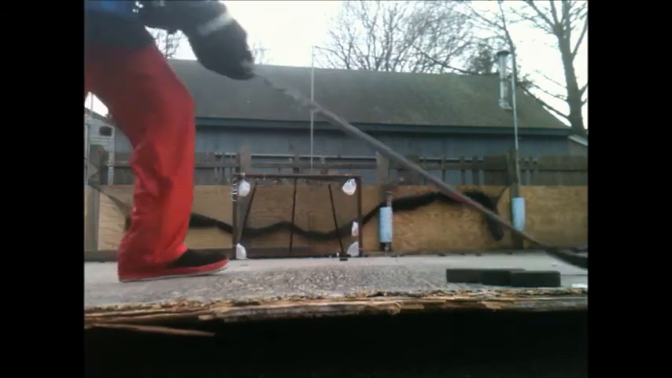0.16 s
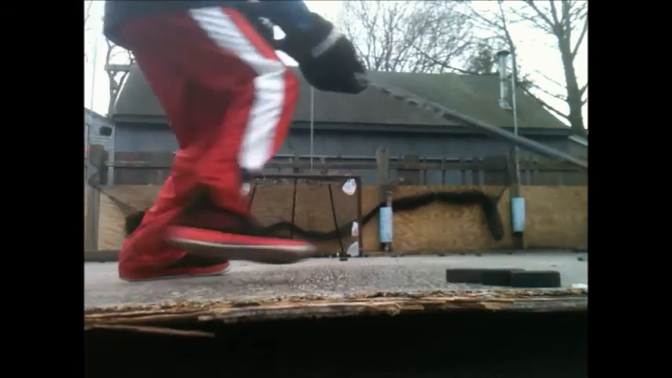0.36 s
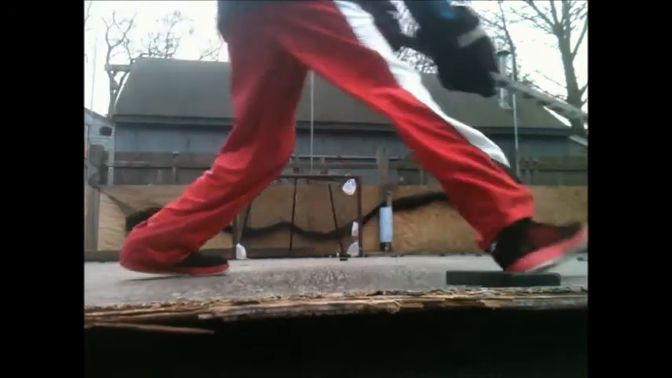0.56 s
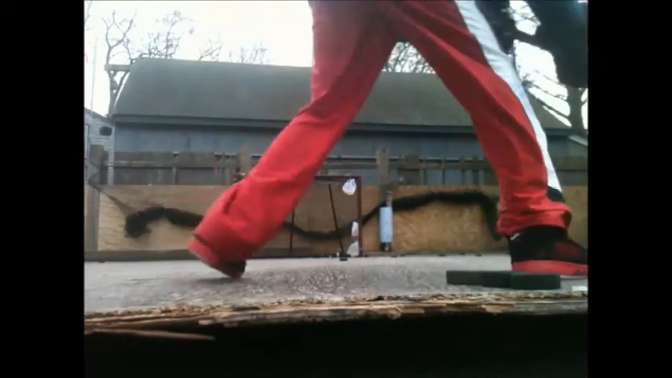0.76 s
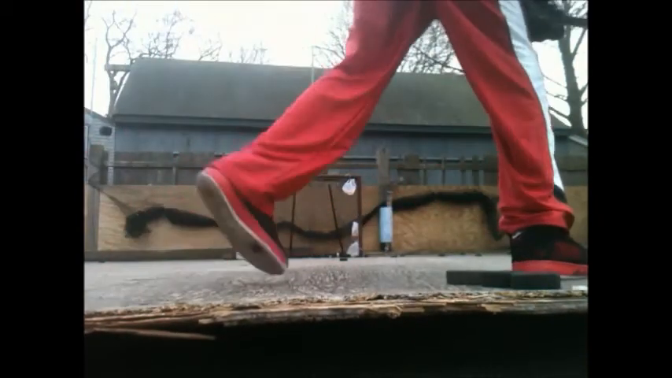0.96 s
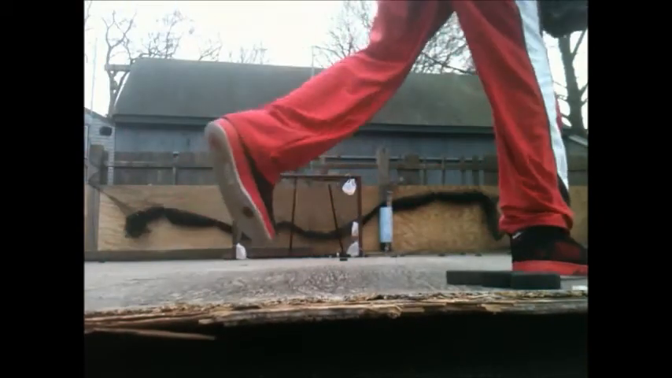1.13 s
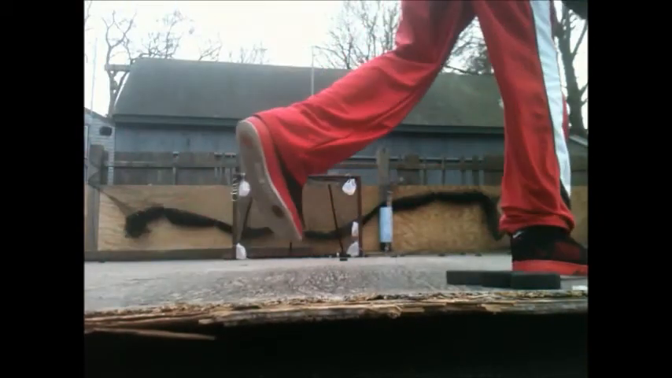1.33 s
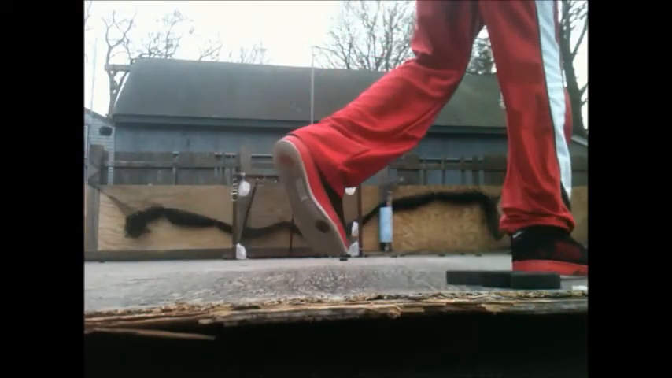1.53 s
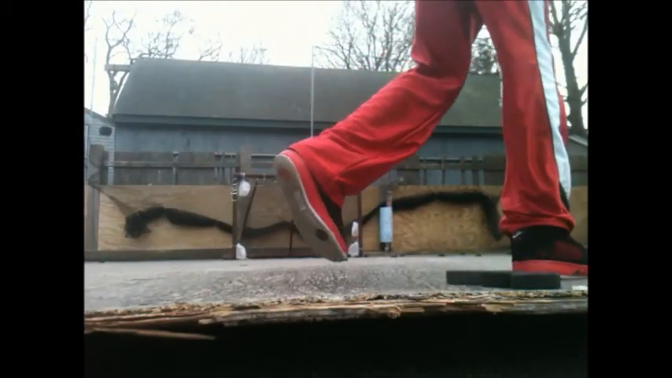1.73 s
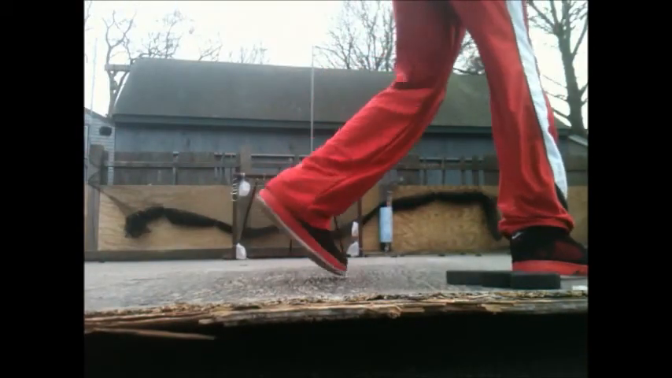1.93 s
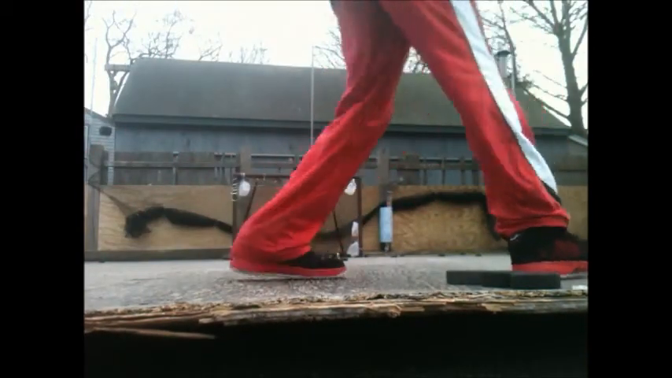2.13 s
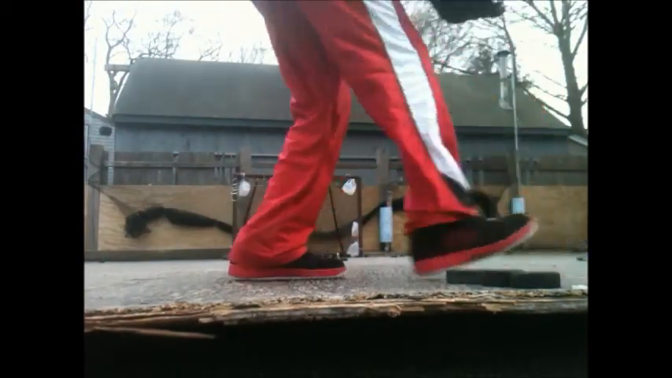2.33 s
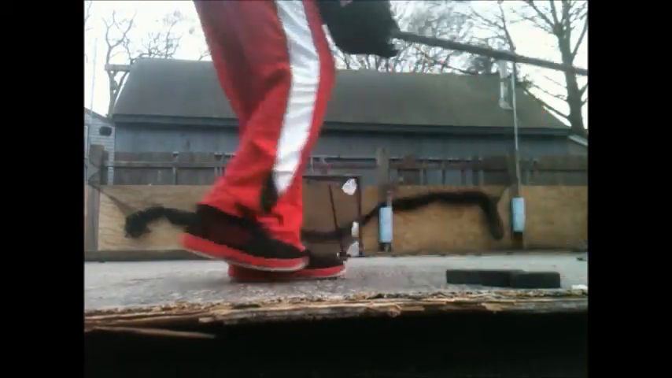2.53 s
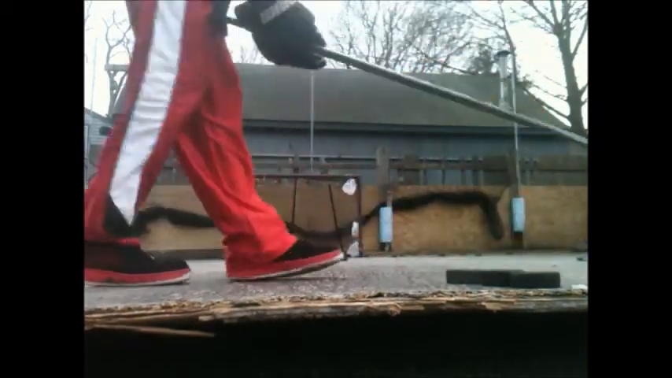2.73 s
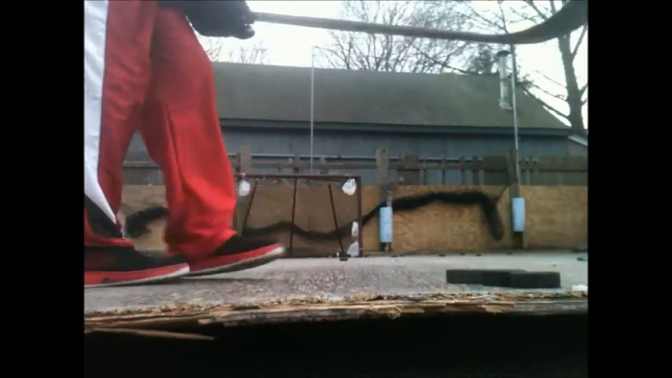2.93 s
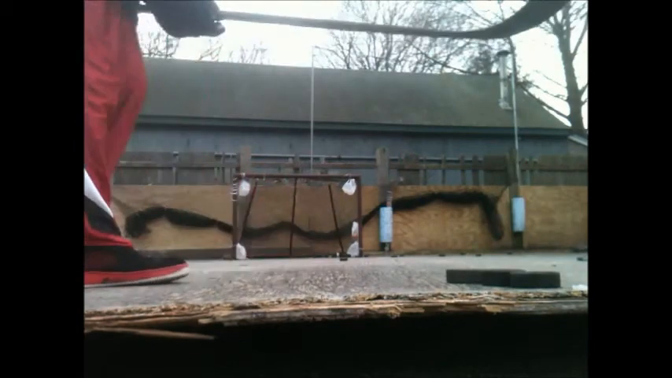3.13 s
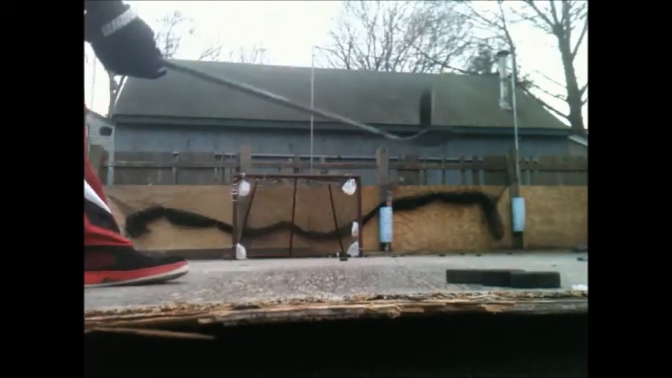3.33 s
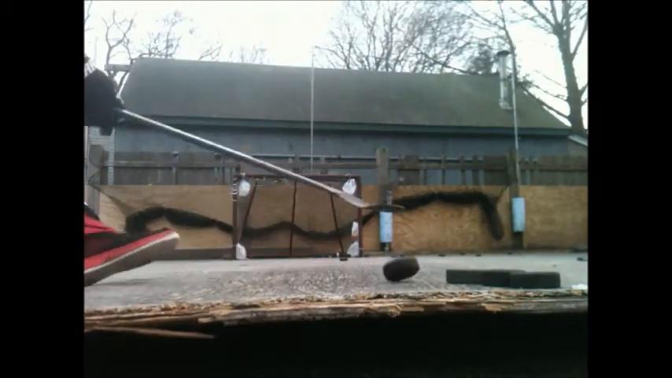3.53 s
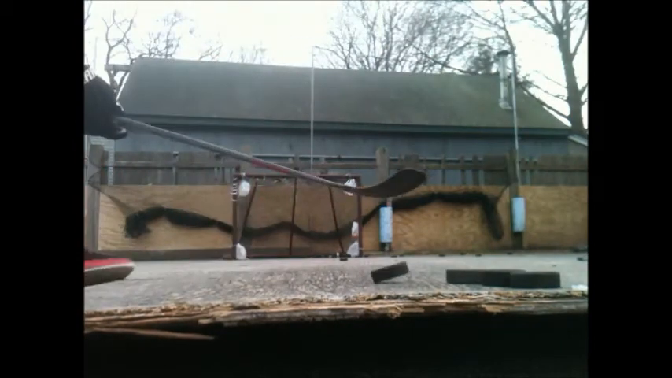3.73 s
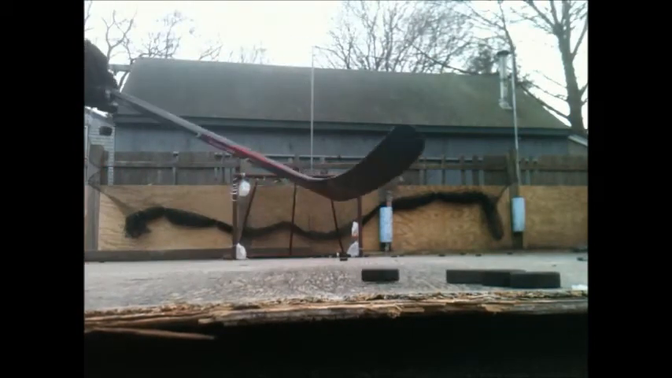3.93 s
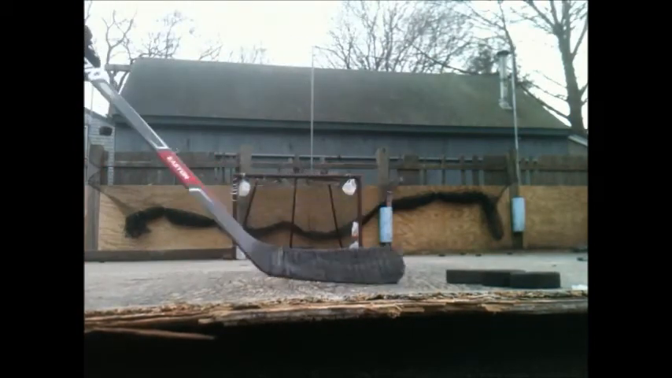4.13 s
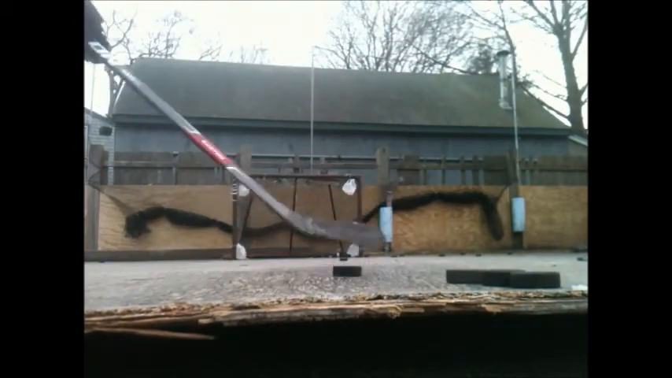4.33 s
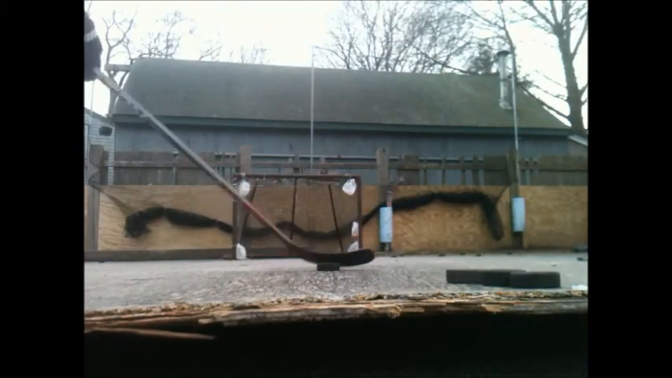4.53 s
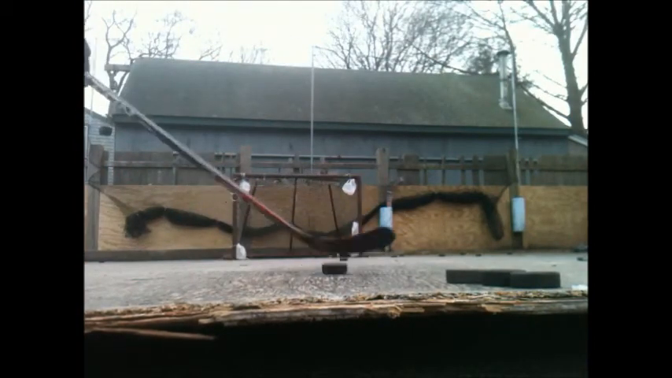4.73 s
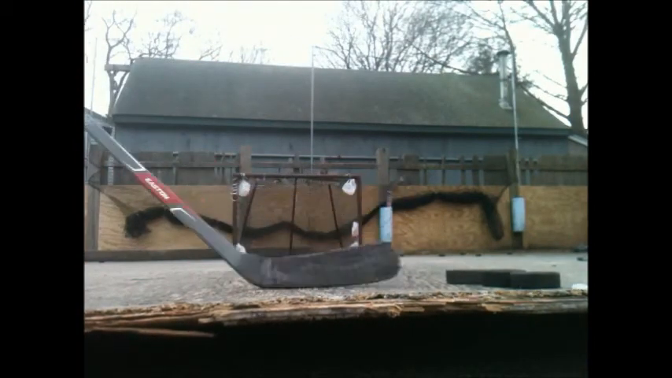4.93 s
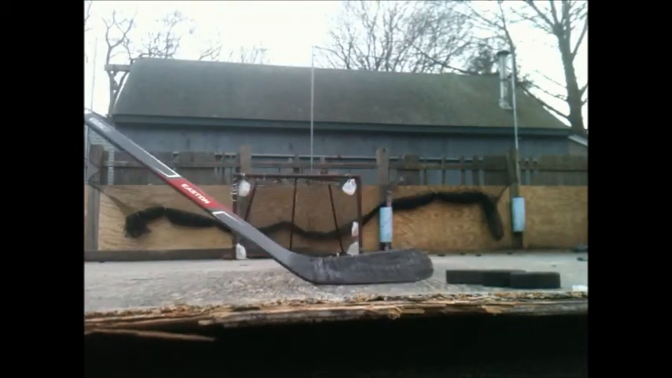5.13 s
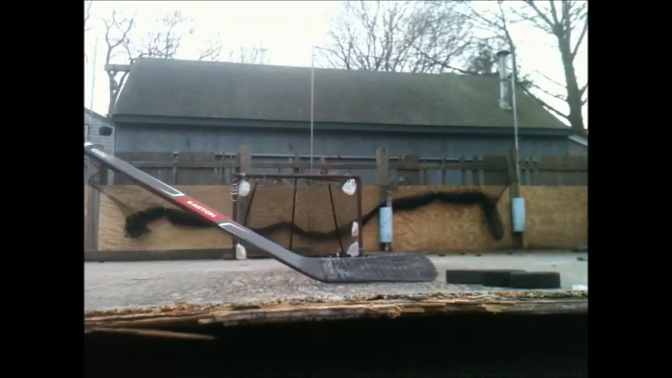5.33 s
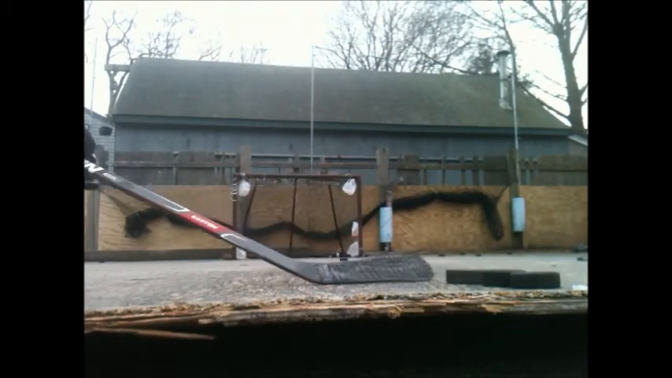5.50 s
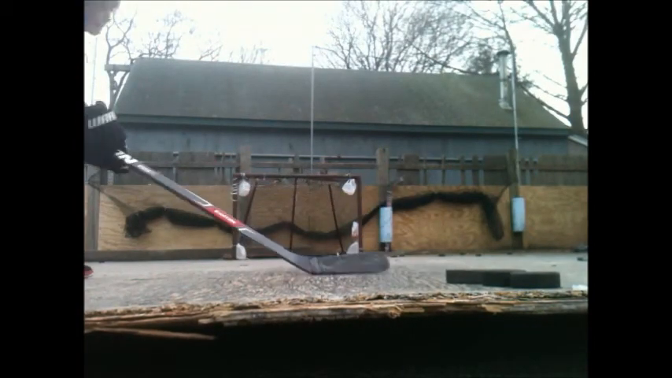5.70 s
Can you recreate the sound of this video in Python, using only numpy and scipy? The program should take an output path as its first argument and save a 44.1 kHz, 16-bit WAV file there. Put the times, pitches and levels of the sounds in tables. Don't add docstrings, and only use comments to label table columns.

```python
import sys
import numpy as np
from scipy import signal
from scipy.fft import rfft, irfft, next_fast_len
from scipy.io import wavfile
from scipy.ndimage import uniform_filter1d, map_coordinates

SR = 44100
rng = np.random.default_rng(int(sys.argv[2]) if len(sys.argv) > 2 else 0)


def digitize_waveform(pressure):
    field = np.atleast_2d(pressure).T
    bounded = np.clip(field, -1, 1)
    quanta = np.round(bounded * 32767).astype(np.int16)
    wavfile.write(sys.argv[1], SR, quanta)


def decibels_to_gain(level_db):
    exponent = np.asarray(level_db, float) / 20
    return 10 ** exponent


N = 254016

# frequency in Hz, level in dB per Hz.
AIR_COLOUR = [(20, -35), (50, -3), (100, 1.5), (160, 2.5), (250, -4), (310, -4), (500, -7.5), (1000, -6),
              (1500, -9.5), (2100, -27.5), (3200, -24), (7000, -16.5), (12500, -20.5), (15700, -24)]
# frequency in Hz, level in dB rms.
CAMERA_WHINE = [(14790, -92), (14850, -92), (14910, -91), (14970, -80), (15030, -81), (15090, -92)]
# frequency in Hz, time to fall by 60 dB in seconds.
FENCE_DECAY = [(200, 0.95), (1000, 0.39), (4000, 0.33), (12000, 0.012)]
# frequency in Hz, level in dB, time to fall by 60 dB in seconds.
BOARD_MODES = [(175, -22, .09), (287, -2, .085), (335, -9, .07), (394, 0, .08), (533, -2.5, .075),
               (610, -7, .06), (715, -6, .06), (830, -5, .06), (975, -8, .05), (1263, -8, .045),
               (1460, -13, .035), (1772, -16, .03), (2330, -21, .025)]
# from this second on, favoured Hz, boost in dB.
STRUCK_SPOTS = [(0, 520, 6), (.58, 750, 4), (.61, 500, 3), (2, 394, 4), (2.5, 530, 6), (3.38, 700, 9),
                (3.57, 394, 6), (3.6, 530, 6), (3.74, 420, 2), (3.87, 394, 12), (3.96, 287, 7),
                (4.01, 394, 4), (4.15, 394, 7), (4.19, 400, 4), (4.35, 560, 10), (4.41, 530, 6),
                (4.6, 560, 7), (4.8, 530, 7), (4.97, 340, 4), (4.998, 530, 7), (5.06, 394, 10),
                (5.09, 287, 9), (5.46, 330, 6), (5.55, 620, 5)]
# time in seconds, level in dB.
DRAG = [(0, -60.5), (.38, -68), (.75, -66.5), (1.07, -64.5), (1.43, -73), (2.53, -64), (2.77, -61.5),
        (3.27, -70.5), (3.62, -66), (3.77, -51), (4.14, -82.5), (4.36, -58), (4.7, -59.5), (5.13, -49),
        (5.3, -55.5), (5.52, -69), (5.66, -63), (5.76, -59)]
# frequency in Hz, level in dB per Hz.
GRIT_COLOUR = [(530, -20), (900, -13.5), (1050, -6.5), (1200, -12.5), (1830, -18.5), (3380, -16.5),
               (4360, -21.5), (4980, -22), (7400, -21.5), (14500, -39), (16000, -51.5)]
# middle in seconds, level in dB, half width in seconds.
GROUND_THUDS = [(.3, -64.5, 0.16), (0.852, -46, .06), (2.77, -59.5, .15), (3.45, -59, 0.28),
                (4.7, -44.5, 0.25), (5.04, -35, 0.071), (5.55, -69, 0.17)]
# start in seconds, length in seconds, grit level in dB, board shake in dB.
SCUFF_EVENTS = [(0.038, 0.118, -52.5, -53), (0.134, 0.04, -50.5, -30), (0.175, 0.044, -40.5, -32),
                (0.588, 0.086, -37.5, -23.5), (0.657, 0.015, -26, -54), (0.738, 0.17, -48.5, -42.5),
                (1.595, 0.18, -64.5, -83.5), (2.287, 0.028, -38, -40.5), (2.541, 0.076, -55.5, -43),
                (2.676, 0.062, -41.5, -40), (2.899, 0.065, -45, -50), (3.15, 0.0059, -40, -67),
                (3.162, 0.035, -48, -52.5), (3.349, 0.047, -47, -51), (3.778, 0.012, -32.5, -19),
                (3.865, 0.052, -35, -36), (3.924, 0.09, -38.5, -43), (4.258, 0.054, -48, -28),
                (4.27, 0.0119, -51, -60), (4.319, 0.0145, -49, -60), (4.981, 0.0065, -25.5, -38.5),
                (4.358, 0.034, -47, -58), (4.533, 0.018, -56.5, -60), (3.595, 0.099, -44.5, -29),
                (0.711, 0.01, -30.5, -57), (4.464, 0.091, -49, -49), (4.853, 0.21, -45, -51),
                (4.973, 0.047, -30.5, -55), (5.148, 0.045, -29, -30), (5.18, 0.058, -36, -38),
                (5.519, 0.29, -43, -35.5), (5.666, 0.05, -43.5, -31.5), (5.597, 0.23, -72, -44)]
# frequency in Hz, level in dB.
CRACK_COLOUR = [(300, -36.5), (1000, 6), (2500, -1.5), (5000, -1), (8000, -10.5), (12000, -20),
                (16000, -22)]
# start in seconds, peak in dB, ring in Hz, 60 dB fall in seconds.
STONES_BURST = [(0.0525, -32, 5600, 0.043), (0.1227, -16.5, 3200, 0.03), (0.346, -25, 6200, 0.0096),
                (.395, -37.5, 5900, 0.007), (0.404, -36, 2370, 0.04), (0.5927, -7, 4280, 0.023),
                (0.608, -7.5, 5270, 0.0085), (0.63, -19, 4780, 0.014), (0.6378, -13, 3740, 0.0058),
                (.664, -19.5, 4820, 0.03), (0.678, -11.5, 5075, 0.015), (0.7138, 0.5, 3785, 0.011),
                (0.74, -14, 2690, 0.039), (0.7799, -25, 2330, 0.01), (0.9017, -28.5, 2650, 0.033),
                (0.99, -37, 4730, 0.0071), (2.1214, -30, 3540, 0.055), (2.1936, -43, 4150, 0.0094),
                (2.2934, -32.5, 5550, 0.066), (2.31, -23.5, 4760, 0.013), (2.853, -21, 5900, 0.018),
                (3.143, -42, 4130, 0.05), (3.391, -33.5, 5500, 0.0068), (3.3945, -32, 7600, 0.033),
                (0.602, -14.5, 5525, 0.017), (0.668, -20.5, 5200, .02), (0.7154, -5.5, 1300, 0.021),
                (.679, -17.5, 1200, 0.037), (2.697, -36, 1900, .02), (2.71, -24, 2470, 0.053),
                (2.816, -45, 2100, 0.016), (2.8508, -18.5, 3300, 0.017), (2.902, -43, 3000, .02),
                (2.919, -35, 4160, .02), (1.1182, -26.5, 1740, 0.022), (4.3255, -34.5, 3900, 0.022),
                (4.4822, -40.5, 3840, .02), (5.0359, -15.5, 1890, 0.04), (5.0985, -23, 4200, 0.019),
                (2.063, -39, 4500, .01), (2.097, -42, 4000, .01), (2.199, -42, 5000, 0.012),
                (2.211, -40, 4500, .012), (.109, -34, 3000, .015)]
# start in seconds, peak in dB, tilt in dB per octave, 60 dB fall in seconds.
SOLE_CLICKS = [(0.098, -31, 8, 0.015), (0.157, -24, 6.5, 0.025), (0.186, -16.5, -18.5, 0.1),
               (0.2006, -28, 7.5, .02), (0.209, -23, -1, 0.033), (0.4598, -40.5, 2, 0.019),
               (0.615, -8.5, 0.5, 0.018), (0.6485, -5, -7, 0.016), (0.6897, -9.5, -5.5, 0.0092),
               (1.011, -28, -13, 0.016), (1.06, -35.5, -23, 0.012), (1.1164, -23.5, -6, 0.029),
               (2.0135, -24, -16, 0.035), (2.047, -26.5, -2, 0.018), (2.145, -32.5, -9, 0.043),
               (2.238, -34.5, 0.8, 0.01), (2.581, -26, 0, 0.053), (2.645, -34.5, -2, 0.032),
               (2.6725, -30, 0, 0.024), (3.4052, -15, 2.5, 0.022), (3.4337, -35, -2, 0.19)]
# start in seconds, peak in dB, tilt in dB per octave,
# 60 dB fall in seconds.
WOOD_CLACKS = [(3.5781, 2.5, -0.5, 0.025), (3.5861, -7, -6.5, 0.04), (3.753, 0, -0.5, 0.02),
               (3.983, -18, -20, 0.014), (4.022, -16.5, -5.5, 0.011), (4.169, 0, -5.5, 0.022),
               (4.2233, -15.5, -14.5, 0.017), (4.2527, -25, -5, 0.012), (4.282, -28.5, 3, 0.006),
               (4.3406, -22, -9.5, 0.023), (4.3652, -16.5, -19, 0.048), (4.4249, -13.5, -12, 0.026),
               (4.6141, -2, -20.5, 0.076), (4.704, -36, 3.5, 0.043), (4.8165, -7, -14, 0.03),
               (4.8445, -21, -10.5, 0.036), (4.9809, 8.5, -2.5, .035), (5.0124, -6, -8, .02),
               (5.026, -22.5, -5, 0.015), (5.0673, -8.5, -3, 0.03), (5.4788, -9.5, -13, .025),
               (5.612, -3, -13, 0.024), (5.6264, -13, -10.5, .0059), (5.676, -15, -18, 0.04),
               (5.7326, -20.5, -12.5, 0.034), (3.7677, -12.5, -5.5, .015), (3.7725, -18, 3.5, .012),
               (3.783, -21.5, 1.5, .012), (3.817, -28, 6, .012), (4.198, -27, -9.5, .015),
               (4.2256, -24, -6, .01), (4.233, -31, -4, .01), (4.292, -33, -4.5, .012),
               (4.361, -27.5, -9.5, .012), (4.375, -22, -9.5, .015), (4.387, -35.5, -6.5, .012),
               (4.395, -37, 1, .012), (4.412, -37, 2.5, .01), (4.4197, -22, -16, .01),
               (4.4542, -28, -7.5, .015), (4.582, -35, -10.5, .015), (4.6573, -14, -19, .02),
               (4.7368, -33, -11.5, .015), (5.054, -15.5, -7, .012), (5.603, -25, 1, .015)]
# start in seconds, peak in dB, 60 dB fall in seconds.
RIM_TICKS = [(3.6098, -9.5, 0.012), (3.641, -26, 0.012), (3.896, -18, 0.0054), (3.915, -24, 0.012),
             (4.069, -32.5, .0092), (4.257, -22.5, 0.025), (4.298, -22.5, 0.014), (4.5166, -36, 0.015),
             (4.537, -30.5, 0.03), (4.7521, -25.5, 0.015), (4.7779, -28, 0.018), (4.8896, -30, 0.012),
             (5.046, -16.5, 0.013), (3.643, -22.5, .015), (4.616, -28, .04)]
# start in seconds, peak in dB, ring in Hz, 60 dB fall in seconds,
# tilt in dB per octave.
AIR_TAP = [
    (3.405, -15, 950, .05, -9),
]
# start in seconds, peak
# in dB, contact in ms, damping factor.
STEP_BLOWS = [(.007, -25.5, 2.1, 1.6), (.05, -38, 1.2, 0.65), (.125, -5.5, 2.8, 1.2),
              (.147, -28, 0.2, 0.099), (.187, -9, 0.17, 1.4), (.199, -15.5, 0.15, 0.69),
              (.5915, 10, 0.08, 6.4), (.6155, 11, 1.7, 2.8), (.624, -4, 1.9, 1.1), (.647, -31, 0.58, 1.2),
              (1.117, -33, 0.36, 1.15), (2.013, -13.5, 2, 1.13), (2.048, -11, 5, 1.1),
              (2.12, -31.5, 0.42, 1.8), (2.292, -10, 5.6, 0.39), (2.304, -23, 0.37, 1.2),
              (2.549, -29.5, 0.22, 1.9), (2.58, -26, 0.22, 1.9), (2.671, -7, 0.5, 1.3),
              (2.939, -24, 1.7, 1.04), (3.172, -25, 2.5, 1.4), (3.334, -35.5, 0.53, 1),
              (3.368, -36.5, 1.4, 0.53), (3.405, -13, 0.34, 0.95), (3.439, -23, 0.25, 1.2)]
# start in seconds, peak in dB, contact in ms,
# damping factor.
PUCK_BLOWS = [(3.5774, 13.5, 0.62, 1.1), (3.585, 6.5, 0.18, 1.5), (3.5914, 12, 0.25, 1.9),
              (3.608, -2, 0.85, 0.74), (3.753, 13, 0.55, 1.3), (3.766, 8, 0.25, 0.95),
              (3.882, -11.5, 0.89, 0.48), (3.894, -5, 0.51, 2), (3.916, -8, 1.2, 4.3),
              (3.985, 1.5, 1.2, 1.65), (4.021, -2, 0.1, 1.1), (4.038, 3.5, 1.1, 2.2),
              (4.065, -8, 0.85, 1.1), (4.168, 7, 0.17, 0.95), (4.207, -19, 1.1, 1.3),
              (4.224, -6.5, 0.29, 1.13), (4.256, -15, 0.91, 0.85), (4.279, -14.5, 0.27, 1.9),
              (4.3, -24, 0.46, 2.1), (4.342, -20, 1.5, 0.84), (3.973, -13.5, 1.7, 1),
              (4.292, -24.5, 0.67, 1.7), (4.316, -20, 1.7, 1.3)]
# start in seconds, peak in dB, contact in ms, damping factor.
BLADE_BLOWS = [(4.36, -18, 0.36, 0.47), (4.364, -1.5, 0.99, 1.8), (4.374, -20, 0.52, 0.41),
               (4.418, -28, 0.66, 2.1), (4.422, -11, 1.1, 0.39), (4.456, -4.5, 0.95, 5.1),
               (4.512, -19, 0.46, 0.87), (4.552, -16, 2.8, 0.069), (4.612, 9, 0.37, 2.04),
               (4.627, -12, 1.3, 1.3), (4.641, -14, 0.6, 0.65), (4.657, -9, 0.4, 3.6),
               (4.667, -3, 1.1, 3.5), (4.58, -26, 0.55, 1), (4.816, -6.5, 0.82, 0.5),
               (4.846, -23.5, 0.37, 0.25), (4.888, -13, 1.27, 1.2), (4.981, 12.5, 0.5, 1.9),
               (4.986, 8.5, 0.7, 0.72), (4.992, 16.5, 0.89, 7.3), (5.002, 13, 0.56, 4.2),
               (5.011, -3, 0.5, 0.81), (5.033, -12.5, 0.88, 0.16), (5.047, -3, 1, 1.2), (5.099, 4, 0.44, 2),
               (5.067, 3.5, 0.22, 1.2), (5.1049, 0.5, 1.56, 1.08), (5.477, 2, 0.76, 1.15),
               (5.566, -15.5, 0.71, 1.2), (5.603, 2, 0.8, 2), (5.6099, 4.5, 0.41, 1.5),
               (5.6254, 2.5, 0.4, 1.4), (5.635, -6, 0.33, 1.4)]


def unit(x):
    return x / np.sqrt(np.mean(x ** 2) + 1e-20)


def along(points, hz):
    f, v = np.transpose(points)
    return np.interp(np.log(hz + 1), np.log(f + 1), v)


def bump(hz, centre_hz, octaves):
    return np.exp(-.5 * (np.log2((hz + 1) / centre_hz) / octaves) ** 2)


def filtered(x, response):
    m = next_fast_len(len(x) + 8192)
    return irfft(rfft(x, m) * response(np.fft.rfftfreq(m, 1 / SR)), m)[:len(x)]


def coloured(x, spectrum):
    return unit(filtered(x, lambda hz: decibels_to_gain(along(spectrum, hz))))


def causal(gain):
    c = irfft(np.log(gain + 1e-6))
    c[1:len(c) // 2] *= 2
    c[len(c) // 2 + 1:] = 0
    return np.exp(rfft(c))


def wobble(rate):
    knots = rng.standard_normal(int(N * rate / SR) + 4)
    return map_coordinates(knots, [np.arange(N) * rate / SR])


def add(track, s, sound):
    part = track[round(s * SR):][:len(sound)]
    part += sound[:len(part)]


def patchy(x, depth_db):
    z = signal.stft(x, nperseg=256)[2]
    field = uniform_filter1d(rng.standard_normal(z.shape), size=5, axis=0)
    field = uniform_filter1d(field, size=12, axis=1)
    return unit(signal.istft(z * decibels_to_gain(depth_db * unit(field)), nperseg=256)[1][:N])


def grains(per_s, spread_db, noise_share):
    hit = rng.random(N) < per_s / SR * decibels_to_gain(5.5 * wobble(35))
    spikes = hit * rng.standard_normal(N) * decibels_to_gain(spread_db * rng.exponential(size=N))
    return unit(spikes) + noise_share * rng.standard_normal(N)


def camera_whine():
    t = np.arange(N) / SR
    carrier_hz, flip_hz = 15000, 60
    out = np.zeros(N)
    for hz, db in CAMERA_WHINE:
        sign = (-1) ** (abs(hz - carrier_hz) // flip_hz)
        out += sign * decibels_to_gain(db + 3 + wobble(8)) * np.sin(2 * np.pi * hz * t)
    return out


def air():
    t = np.arange(N) / SR
    drone = decibels_to_gain(-72 + 3 * wobble(42)) * np.sin(2 * np.pi * 242 * t + 0.5 * wobble(36))
    town = decibels_to_gain(.5 * wobble(3)) * coloured(patchy(rng.standard_normal(N), .8), AIR_COLOUR)
    return decibels_to_gain(-65) * town + drone


def yard(x):
    hz, t, z = signal.stft(rng.standard_normal((4, SR // 2)), SR, nperseg=256)
    fade = decibels_to_gain(-60 * t / along(FENCE_DECAY, hz)[:, None])
    tails = signal.istft(z * fade, SR, nperseg=256)[1]
    turns = (np.arange(N) // 64 % 4 == np.arange(4)[:, None]) * x
    delayed = np.pad(turns, ((0, 0), (300, 0)))
    return signal.fftconvolve(delayed, tails / np.linalg.norm(tails[0]), axes=1).sum(axis=0)[:N]


def ringing(damping, favoured_hz, boost_db, chance):
    t = np.arange(6400) / SR
    hz, db, t60 = np.transpose(BOARD_MODES)[:, :, None]
    t = np.maximum(t - 0.0016 * (np.sqrt(1000 / hz) - .65), 0)
    swell = 1 - np.exp(-2.8 * hz * t)
    sign = (-1.) ** (np.arange(len(BOARD_MODES))[:, None] // 5)
    weight = swell * sign * .75 * decibels_to_gain(boost_db * bump(hz, favoured_hz, 0.2))
    strength_db, detune = 1.5 * chance[:, :1], 0.023 * chance[:, 1:2]
    rocking = np.repeat(np.cumsum(chance[:, 2:], axis=1), 64, axis=1)
    blur = .2 * uniform_filter1d(rocking, size=64, axis=1)
    fade = decibels_to_gain(db + strength_db - 60 * t * damping / t60)
    return np.sum(weight * fade * np.sin(2 * np.pi * hz * (1 + detune) * t + blur), axis=0)


def shaken():
    body = ringing(16, 620, 20, np.zeros((len(BOARD_MODES), 102)))
    knocks = patchy(grains(500, 1.2, .8), 2.5)
    return unit(signal.fftconvolve(knocks, body)[:N])


def ground_thuds():
    t = np.arange(N) / SR
    thud = np.full(N, decibels_to_gain(-67))
    for s, db, width in GROUND_THUDS:
        thud += decibels_to_gain(db) * np.exp(-((t - s) / width) ** 2)
    return thud * unit(filtered(rng.standard_normal(N), lambda hz: bump(hz, 150, .3)))


def sliding():
    drag_db = np.interp(np.arange(N) / SR, *np.transpose(DRAG))
    rumble = decibels_to_gain(-49 + 1.24 * (drag_db + 54.5))
    crackle = decibels_to_gain(1.5 * wobble(30)) * coloured(patchy(grains(1500, 1.8, 1.2), 3), GRIT_COLOUR)
    return rumble * shaken() + decibels_to_gain(drag_db) * crackle


def squeak():
    start_s, length_s, sag_hz_per_s = .548, .045, 20000
    u = np.clip((np.arange(N) / SR - start_s) / length_s, 0, 1)
    slips_hz = 3800 - sag_hz_per_s * length_s * u + 200 * wobble(250)
    phase = 2 * np.pi * np.cumsum(slips_hz) / SR
    grip = decibels_to_gain(-56 + 4 * wobble(300)) * np.sqrt(u) * (u < 1)
    return grip * (np.sin(phase) + decibels_to_gain(-6) * u * np.sin(2 * phase))


def scuffs():
    out, board = np.zeros(N), shaken()
    grit = patchy(grains(2500, 1.5, .5), 2.8)

    def grit_response(hz):
        return decibels_to_gain(along(GRIT_COLOUR, hz)) * (1 + 0.26 * bump(hz, 4300, 0.5))

    for s, length, db, shake_db in SCUFF_EVENTS:
        t = np.arange(round(length * 2 * SR)) / SR
        stroke = (1 - np.exp(-t / (0.22 * length))) * np.exp(-(t / length) ** 3)
        part = slice(round(s * SR), round(s * SR) + len(t))
        crunch = unit(filtered(grit[part], grit_response))
        add(out, s, stroke[:len(crunch)] * (decibels_to_gain(db) * crunch + decibels_to_gain(shake_db) * board[part]))
    return out


def contacts():
    stones = [(*row, 0) for row in STONES_BURST]
    rim = [(s, db, 3580, t60, 0.5) for s, db, t60 in RIM_TICKS]
    clicks = [(s, db, 1820, t60, tilt_db) for s, db, tilt_db, t60 in SOLE_CLICKS]
    clacks = [(s, db, 814, t60, tilt_db) for s, db, tilt_db, t60 in WOOD_CLACKS]
    return sorted([tuple(row) for row in AIR_TAP] + stones + rim + clicks + clacks)


def cracks():
    out, t = np.zeros(N), np.arange(2048) / SR
    hz = np.fft.rfftfreq(len(t), 1 / SR)
    edge = 1 - np.exp(-(t / 0.00052) ** 2)
    lead_s, contact_s = 0.0044, 0.00045
    lead = round(lead_s * SR)
    for s, db, ring_hz, t60, tilt_db in contacts():
        noise = rng.standard_normal(len(t))
        ring = 0.69 * (ring_hz / 1000) ** 1.1 * bump(hz, ring_hz, .17)
        colour = decibels_to_gain(along(CRACK_COLOUR, hz) + tilt_db * np.log2((hz + 300) / 3000)) * (1 + ring)
        first = irfft(rfft(noise[::-1] * np.exp(-t / 0.0002)) * causal(colour))
        first = first / np.abs(first).max()
        tail = edge * decibels_to_gain(-9.5) * unit(irfft(rfft(noise) * colour))
        squeezed = decibels_to_gain(db - 22) * np.linspace(0, 1, lead) ** 2 * unit(tail)[-lead:]
        add(out, s + contact_s - lead_s, squeezed)
        add(out, s + contact_s, decibels_to_gain(db - 60 * t / max(t60, .002)) * (first + tail))
    return out


def blows():
    out = np.zeros(N)
    for s, db, contact_ms, damping in [*STEP_BLOWS, *PUCK_BLOWS, *BLADE_BLOWS]:
        chance = rng.standard_normal((len(BOARD_MODES), 102))
        _, favoured_hz, boost_db = max(tuple(spot) for spot in STRUCK_SPOTS if spot[0] <= s)
        u = np.arange(SR // 200) / SR * 1000 / max(contact_ms, .05)
        push = np.sin(np.pi * np.minimum(u, 1)) ** 2
        push = push / (push.sum() + 1e-9)
        add(out, s, decibels_to_gain(db - 11) * np.convolve(ringing(damping, favoured_hz, boost_db, chance), push))
    return out


def scene():
    hits = blows() + cracks()
    near = hits + decibels_to_gain(-25) * yard(hits) + scuffs() + sliding() + ground_thuds()
    no_bass = signal.butter(N=3, Wn=184.4, btype="high", fs=SR, output="sos")
    return (signal.sosfilt(no_bass, near) + air() + camera_whine() + squeak())[None]


def roll_off(x):
    return signal.sosfilt(signal.butter(12, 16470, fs=SR, output="sos"), x)


def record(dry):
    limited = filtered(dry[0], lambda hz: hz < 15750)
    squash = limited / (1 + np.abs(limited) ** 12) ** (1 / 12) - limited
    coupling_hz = 105.9
    shed = filtered(squash, lambda hz: 1j * hz / (coupling_hz + 1j * hz))
    mix = np.clip(limited + shed, -1, 1)[None]
    return roll_off(mix)


dry = scene()
out = record(dry)
digitize_waveform(out)
```